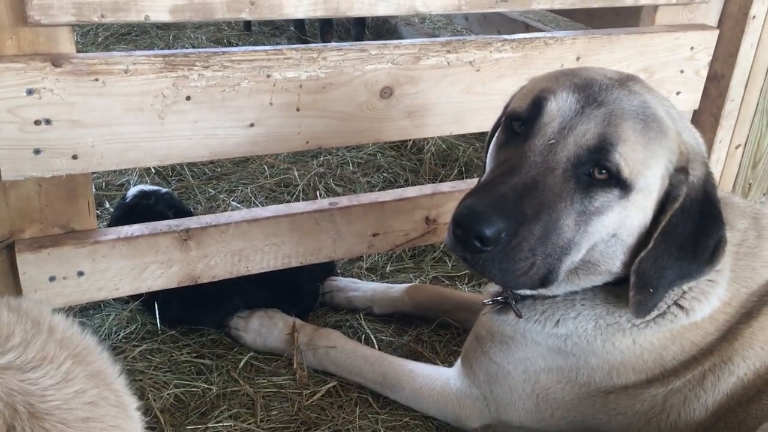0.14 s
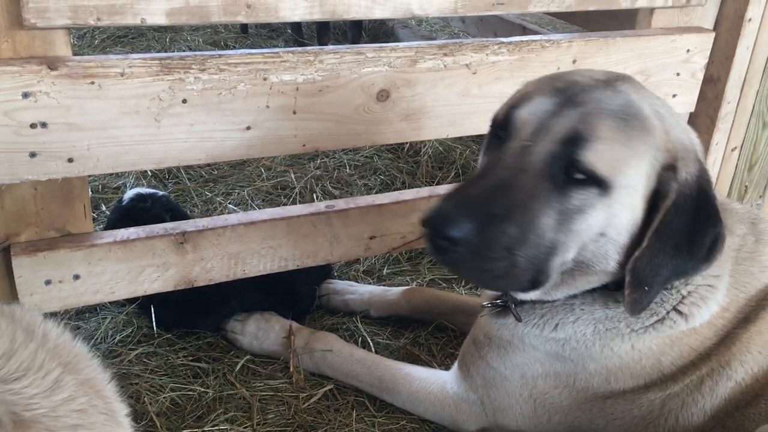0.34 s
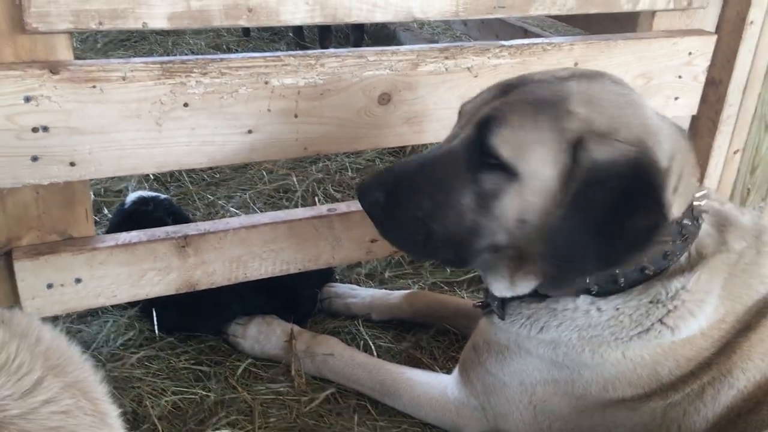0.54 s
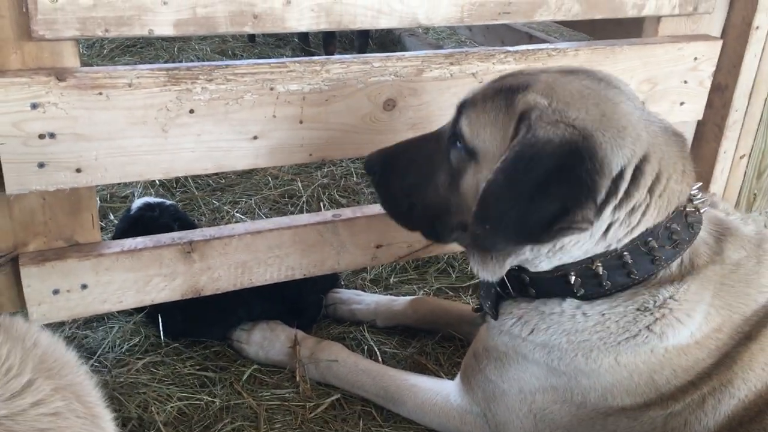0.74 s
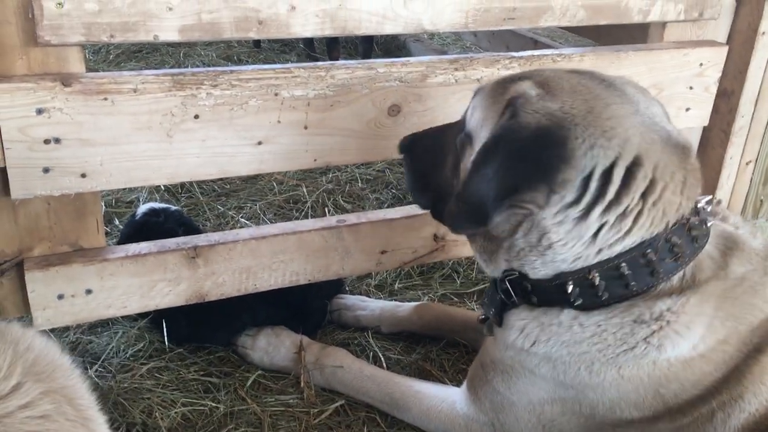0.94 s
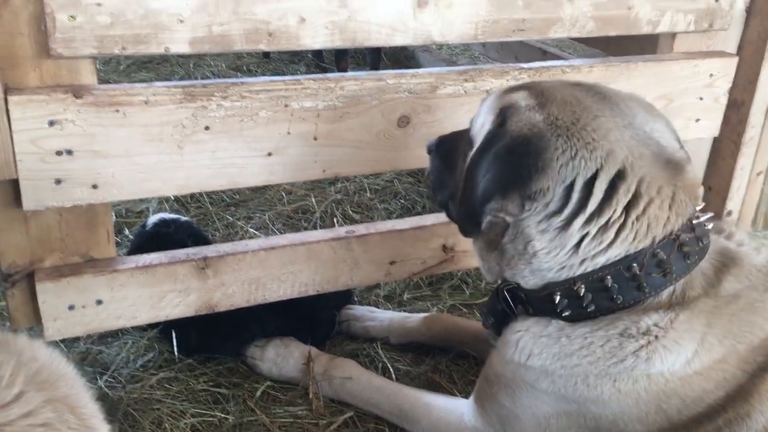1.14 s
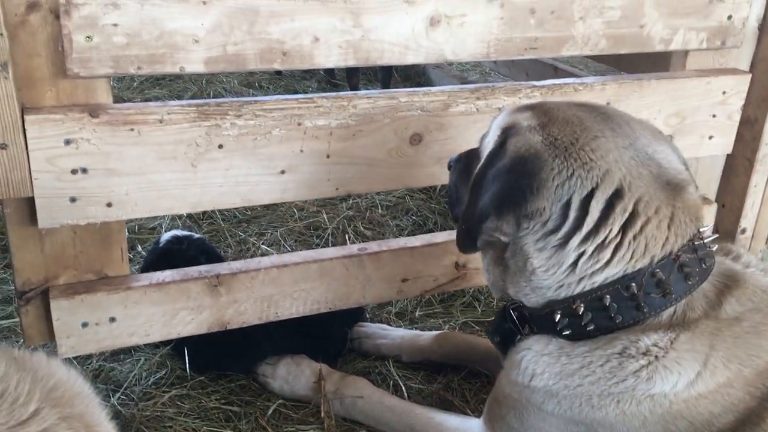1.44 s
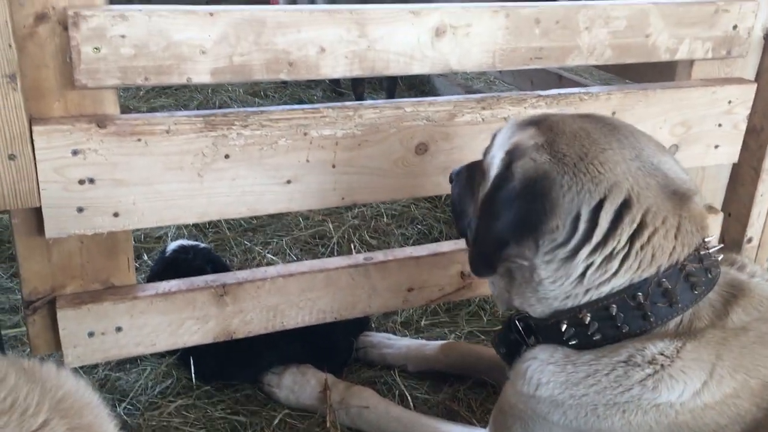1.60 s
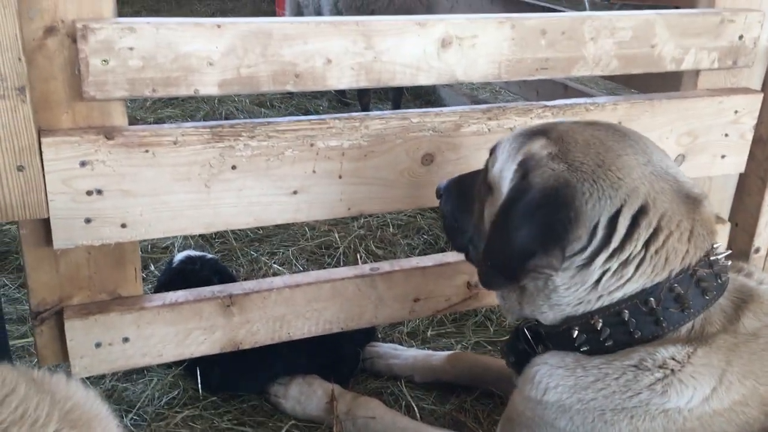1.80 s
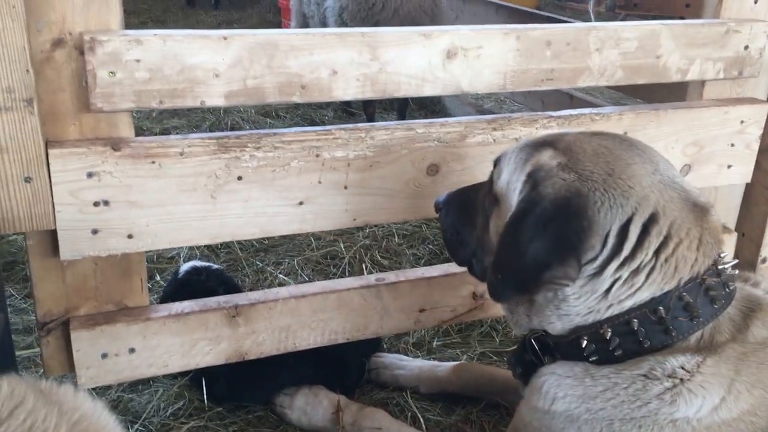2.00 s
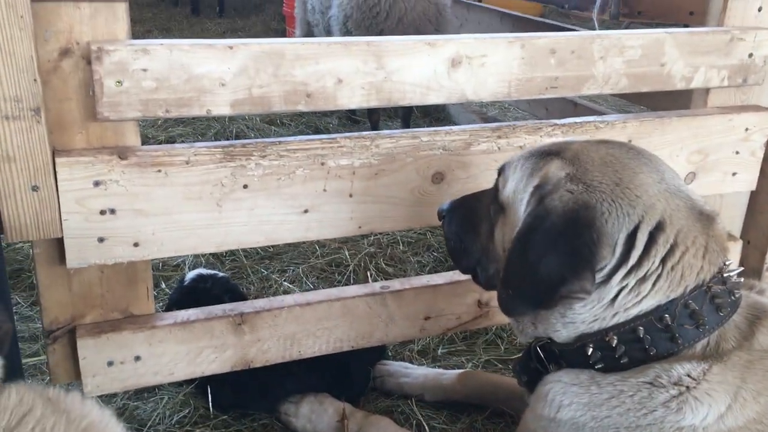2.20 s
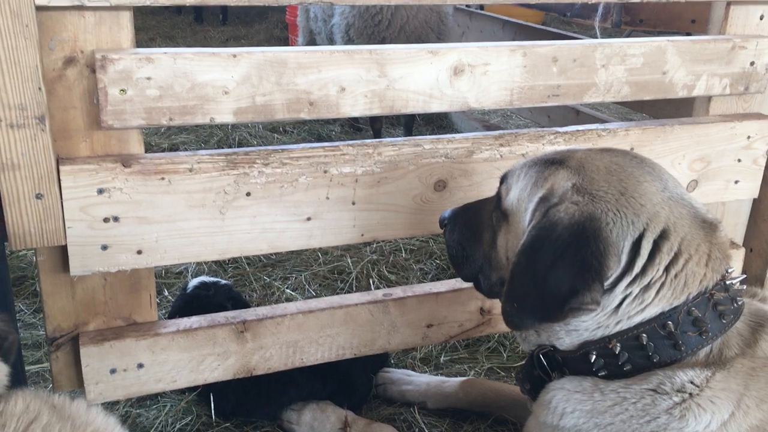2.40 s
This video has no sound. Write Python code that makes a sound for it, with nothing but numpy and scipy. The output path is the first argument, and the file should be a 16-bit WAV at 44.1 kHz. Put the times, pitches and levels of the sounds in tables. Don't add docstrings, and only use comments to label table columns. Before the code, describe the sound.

A lamb gives a short muffled hum, then one open, rising bleat that drops at its end and echoes in a wooden barn; faint ticks follow, then a quick double knock, over quiet low rumble.

```python
import sys
import numpy as np
from scipy import signal
from scipy.fft import rfft, irfft, next_fast_len
from scipy.io import wavfile
from scipy.ndimage import uniform_filter1d, map_coordinates

SR = 44100
rng = np.random.default_rng(int(sys.argv[2]) if len(sys.argv) > 2 else 0)


def transcribe(signal):
    frames = np.atleast_2d(signal).T
    limited = np.clip(frames, -1, 1)
    pcm = np.round(limited * 32767).astype(np.int16)
    wavfile.write(sys.argv[1], SR, pcm)


def level_to_linear(level):
    exponent = np.asarray(level, float) / 20
    return 10 ** exponent


N = 112454


def unit(x):
    return x / np.sqrt(np.mean(x ** 2) + 1e-20)


def along(points, hz):
    f, v = np.transpose(points)
    return np.interp(np.log(hz + 1), np.log(f + 1), v)


def wobble(rate):
    return map_coordinates(rng.standard_normal(400), [np.arange(N) * rate / SR])


def filtered(x, response):
    m = next_fast_len(N + SR // 2)
    return irfft(rfft(x, m) * response(np.fft.rfftfreq(m, 1 / SR)), m)[:N]


def tract(resonances):
    # centre in Hz, width in Hz.
    side_pockets = [(3100, 510), (7400, 170), (12900, 340)]
    pocket_depth, voice_top_hz = .85, 12400

    def bandpass(f, centre, width):
        return 1j * f * width / (centre * centre - f * f + 1j * f * width)

    def response(f):
        h = 0
        for k, (centre, width, db) in enumerate(resonances):
            h = h + (-1) ** k * level_to_linear(db) * bandpass(f, centre, width)
        h = h * (.3 + .7 / (1 + (f / voice_top_hz) ** 24))
        for centre, width in side_pockets:
            h = h * (1 - pocket_depth * bandpass(f, centre, width))
        return h
    return response


def voice(rows, narrow, wide):
    s, *cols = np.transpose(rows)
    t = np.arange(N) / SR
    hz, db, breath, mouth = [np.interp(t, s, c) for c in cols]
    share, mouth = np.clip(breath, 0, 1), np.clip(mouth, 0, 1)
    jitter, jitter_per_s = .002, 60
    shimmer_db, shimmer_per_s = 1, 30
    phase = 2 * np.pi * np.cumsum(hz * (1 + jitter * wobble(jitter_per_s))) / SR

    flutter_db, flutter_per_s, flutter_full = 2.2, 30, 10
    smear = 1.3
    pulses = np.zeros(N)
    for k in range(1, 41):
        flutter = level_to_linear(flutter_db * min(1, k / flutter_full) * wobble(flutter_per_s))
        pulses += flutter * np.cos(k * phase + smear * rng.standard_normal())
    pulses = unit(pulses)

    gated = rng.standard_normal(N) * (1 + np.cos(phase))
    air = unit(filtered(gated, lambda f: level_to_linear(7 * np.log2((f + 1) / SR))))
    gain = level_to_linear(db + shimmer_db * wobble(shimmer_per_s)) * (t > s[0]) * (t < s[-1])
    source = gain * (np.sqrt(1 - share) * pulses + np.sqrt(share) * air)

    def shaped(resonances):
        response = tract(resonances)
        return filtered(source, response) / np.std(filtered(pulses, response))
    return (1 - mouth) * shaped(narrow) + mouth * shaped(wide)


def bleat():
    # time in seconds, pitch in Hz, effort in dB, breath share 0-1, mouth opening 0-1.
    hum = [(.075, 340.5, -59.5, 0.5, 0), (.12, 366.2, -63, .5, 0), (.15, 378, -48.5, 0.64, 0),
           (.195, 394, -38.5, 0.93, 0), (.23, 396, -43.5, 0.86, 0), (.255, 409, -45.5, 0.24, 0),
           (.28, 388.4, -52, 0.2, 0), (.292, 349, -49.5, 0.25, 0), (.305, 369, -85, 0.2, 0)]
    call = [(.30, 368.7, -56, .02, .01), (.40, 382.3, -38, 0.08, 0.11), (.48, 400.3, -35, 0.27, 0.8),
            (.605, 392.8, -37.5, 0.29, 0.85), (.75, 433.2, -33.5, 0.26, 1), (.81, 431.7, -31, 0.45, 0.79),
            (.855, 390.7, -38.5, 0.18, 0.59), (.872, 369, -40.5, 0, 0.39), (.895, 333, -71, 0.32, 0.7)]
    # resonance in Hz, width in Hz, level in dB.
    shut = [(401, 75, 4.5), (1240, 330, -2), (2110, 470, -6.5), (4800, 1160, -15), (5940, 920, -10.5),
            (13100, 3700, -47)]
    ajar = [(421, 180, -2.5), (796, 290, 3.5), (1166, 140, 5.5), (1570, 420, -3), (2207, 164, 4),
            (3680, 340, -17), (4360, 300, -4.5), (5160, 500, -3.5), (6400, 1100, -24)]
    wide_open = [(417, 750, -16.5), (848, 93, -1.5), (1214, 626, -1), (1546, 440, 3.5), (2460, 430, -1.5),
                 (3793, 296, -2), (4330, 520, -9.5), (5980, 920, -7), (7800, 1800, -35),
                 (9360, 3600, -30.5), (12050, 600, -34.5), (13700, 2400, -60)]
    return voice(hum, shut, shut) + voice(call, ajar, wide_open)


def pen(x):
    # delay in seconds, level in dB.
    walls = [(.0023, -10.5), (.0051, -8.5), (.0087, -10.5), (.0132, -4), (.0178, -12.5), (.0241, -2.5),
             (.031, -16.5)]
    out = x.copy()
    for k, (delay, db) in enumerate(walls):
        out += (-1) ** k * level_to_linear(db) * np.pad(x, (round(delay * SR), 0))[:N]
    return out


def ring(hz, db, t60):
    t = np.arange(SR // 8) / SR
    return level_to_linear(db - 60 * t / t60) * np.sin(2 * np.pi * hz * t) * (1 - np.exp(-t / 0.00013))


def collar_tag():
    # time in seconds, peak level in dB.
    ticks = [
        (1.069, -46),
    ]
    # mode in Hz, level in dB, T60 in seconds.
    modes = [(6483, -25, 0.12), (8280, -15, 0.026), (10100, -11, 0.0096), (11100, -16, 0.019),
             (12200, -5, 0.026), (14070, -22, 0.037), (15440, -23, 0.036)]
    out = np.zeros(N + SR)
    for s, db in ticks:
        tick = sum(ring(hz, db + level + 1, t60) for hz, level, t60 in modes)
        out[round(s * SR):][:len(tick)] += tick
    return out[:N]


def small_snaps():
    # time in seconds, peak level in dB, pitch in Hz, T60 in seconds.
    snaps = [
        (.0563, -50, 1400, .018),
        (1.2185, -53, 7500, .008),
        (1.2185, -66, 15400, .012),
        (1.055, -56, 1500, .04),
        (2.282, -49, 295, .1),
        (.09, -60, 1050, .06),
    ]
    out = np.zeros(N + SR)
    for s, db, hz, t60 in snaps:
        snap = ring(hz, db, t60)
        out[round(s * SR):][:len(snap)] += snap
    return out[:N]


def knocks():
    # time in seconds, level in dB, brightness in dB per octave, T60 in seconds.
    hits = [
        (.062, -50, -5, 0.2),
        (1.351, -57, 7.5, 0.29),
        (1.45, -62, 9, 0.2),
        (1.775, -49.5, -3, 0.13),
        (1.8457, -48.5, 5, 0.12),
        (1.89, -51.5, -7.5, 0.22),
        (2.221, -49.5, 1.5, 0.13),
        (2.2765, -32, 1, .13),
        (2.313, -33.5, -2.5, 0.098),
        (2.35, -43, -5.5, 0.18),
    ]
    # frequency in Hz, level in dB.
    board = [(150, -26), (350, -10.5), (600, -3), (1100, -3.5), (2400, -7), (2900, -13.5), (7000, -25),
             (12000, -41)]
    t = np.arange(SR // 4) / SR
    rise = 1 - np.exp(-t / .004)
    out = np.zeros(N)
    for s, db, tilt_db, t60 in hits:
        burst = np.zeros(N + SR)
        burst[round(s * SR):][:len(t)] = level_to_linear(db - 60 * t / t60) * rise * rng.standard_normal(len(t))
        out += filtered(burst[:N], lambda f: level_to_linear(along(board, f) + tilt_db * np.log2((f + 1) / 1500)))
    return out


def barn(x):
    # frequency in Hz, T60 in seconds.
    decay = [(300, 1), (1000, 0.95), (3000, 0.66), (8000, 0.53), (15000, 0.9)]
    delay_s, build_s = .008, .012
    hz, t, z = signal.stft(rng.standard_normal(SR), SR, nperseg=256)
    tail = signal.istft(z * level_to_linear(-60 * t / along(decay, hz)[:, None]), SR, nperseg=256)[1]
    tail = tail * (1 - np.exp(-np.arange(len(tail)) / SR / build_s))
    delayed = np.pad(x, (round(delay_s * SR), 0))
    return signal.fftconvolve(delayed, tail / np.linalg.norm(tail))[:N]


def rush(spectrum, patchy_db):
    z = signal.stft(rng.standard_normal(N), nperseg=512)[2]
    field = uniform_filter1d(uniform_filter1d(rng.standard_normal(z.shape), 8, 0), 14, 1)
    x = signal.istft(z * level_to_linear(patchy_db * unit(field)), nperseg=512)[1][:N]
    return unit(filtered(x, lambda f: level_to_linear(along(spectrum, f))))


def barn_floor():
    # frequency in Hz, level in dB per Hz.
    rumble = [(13, -41), (22, -21), (65, -2.5), (114, -9.5), (162, -14), (406, -23.5), (450, -21),
              (500, -33), (650, -87), (1100, -120)]
    air = [(290, -61), (500, -7.5), (537, 1), (668, 0), (707, -5.5), (2420, -10.5), (4120, -15),
           (11800, -19), (15800, -21.5)]
    from_middle = (np.arange(N) - N / 2) / SR
    air_db = -71 - 1.33 * from_middle
    return level_to_linear(-56.5) * rush(rumble, patchy_db=0) + level_to_linear(air_db) * rush(air, patchy_db=0.6)


def scene():
    lamb, near, far = bleat(), collar_tag() + small_snaps(), knocks()
    direct = level_to_linear(-4.5) * pen(lamb) + near + far
    wet = level_to_linear(-7) * barn(lamb) + level_to_linear(-19) * barn(near) + level_to_linear(-3) * barn(far)
    return (direct + wet + barn_floor())[None]


def top_cut(x):
    return signal.sosfilt(signal.butter(12, 16370, fs=SR, output="sos"), x)


def record(dry):
    def microphone(f):
        return (f < 15900) / np.sqrt(1 + (33 / (f + 1)) ** 8)
    return top_cut(filtered(dry[0], microphone)[None])


dry = scene()
out = record(dry)
transcribe(out)
```